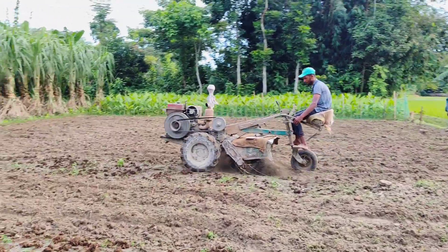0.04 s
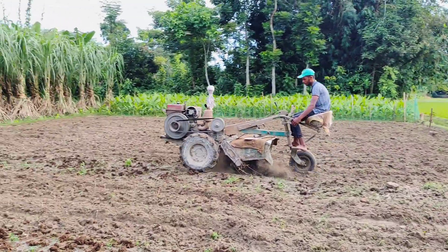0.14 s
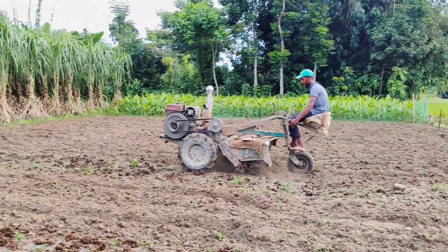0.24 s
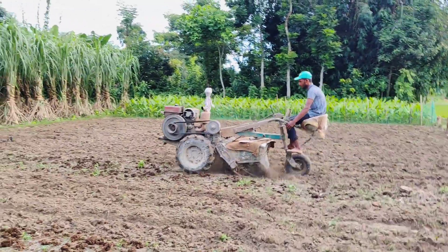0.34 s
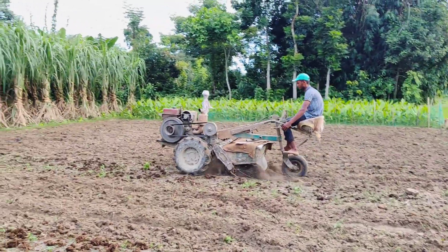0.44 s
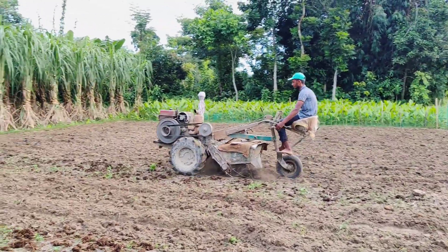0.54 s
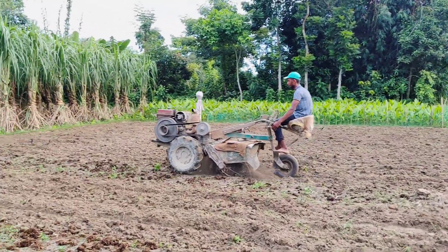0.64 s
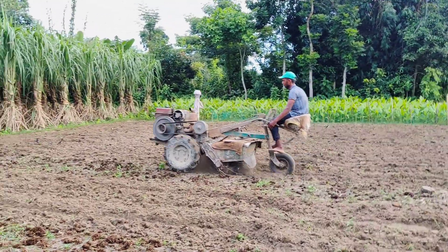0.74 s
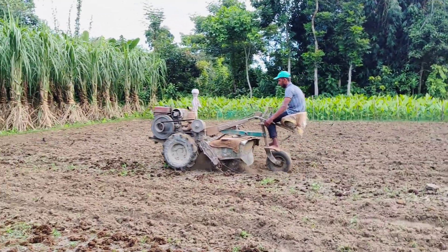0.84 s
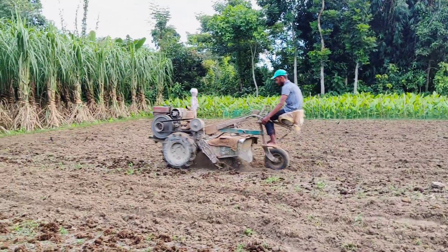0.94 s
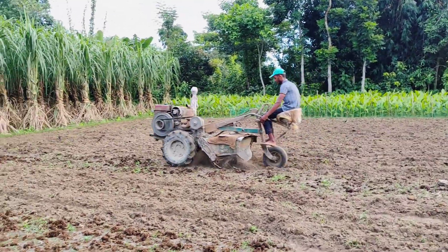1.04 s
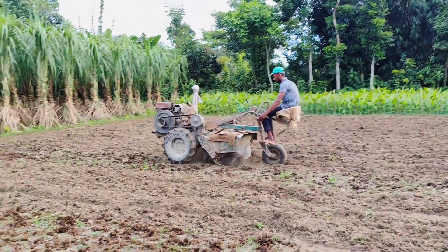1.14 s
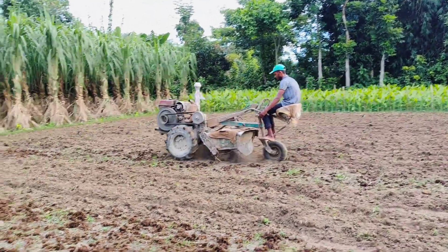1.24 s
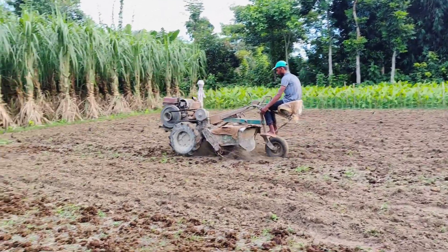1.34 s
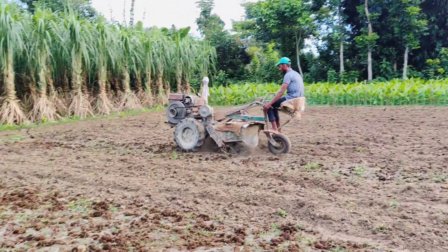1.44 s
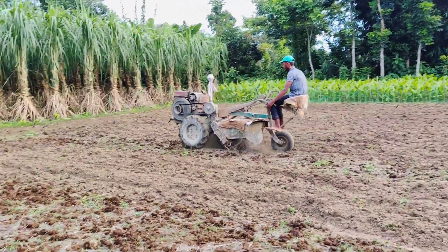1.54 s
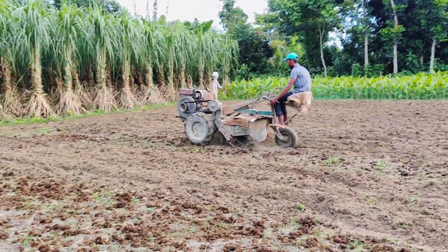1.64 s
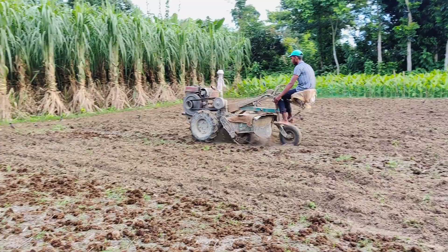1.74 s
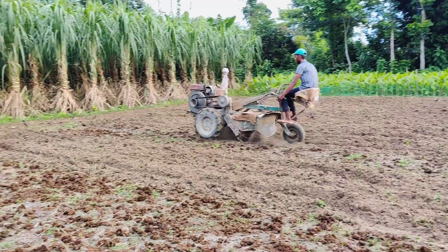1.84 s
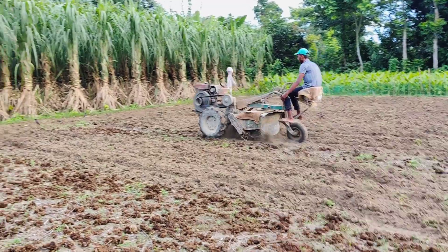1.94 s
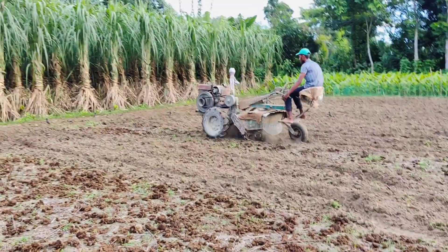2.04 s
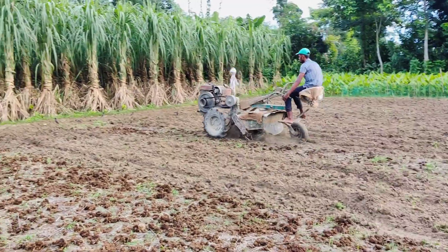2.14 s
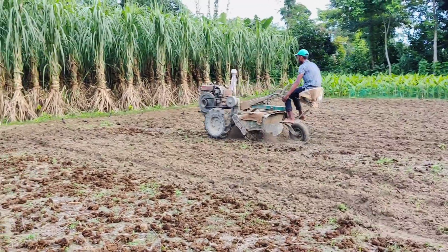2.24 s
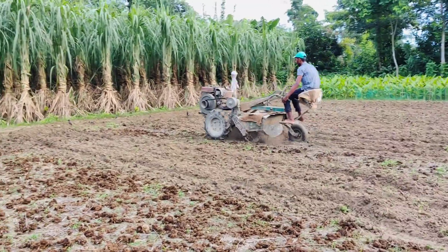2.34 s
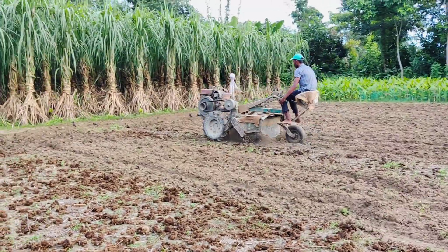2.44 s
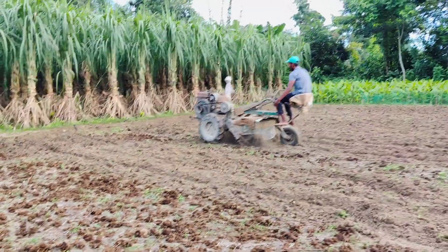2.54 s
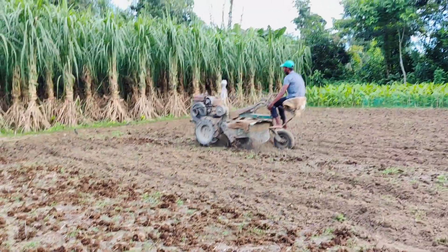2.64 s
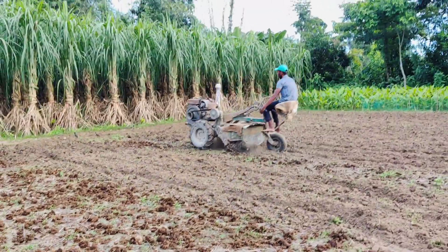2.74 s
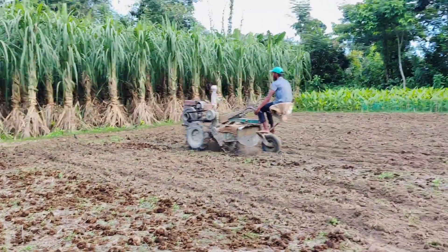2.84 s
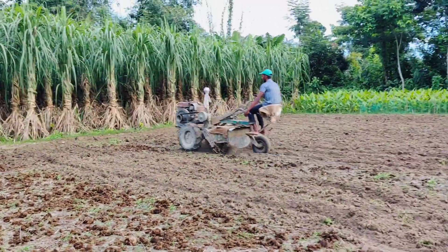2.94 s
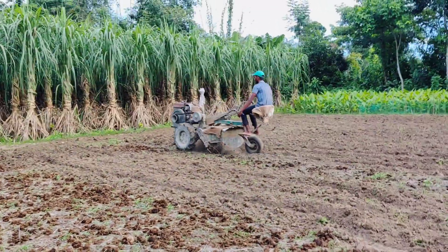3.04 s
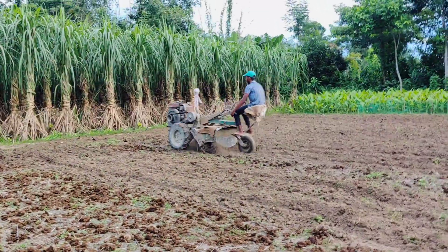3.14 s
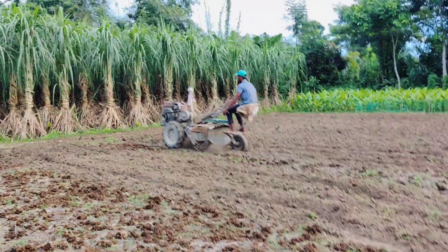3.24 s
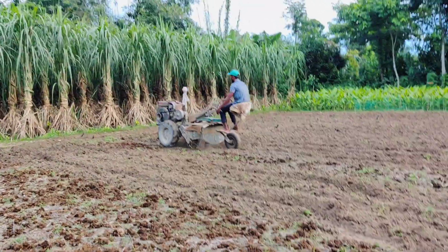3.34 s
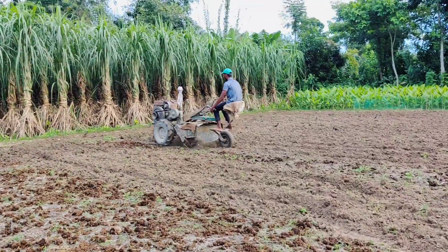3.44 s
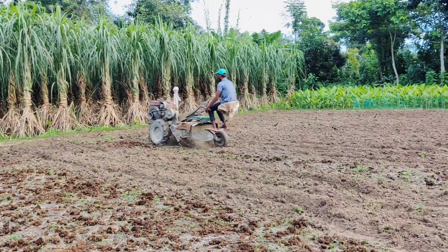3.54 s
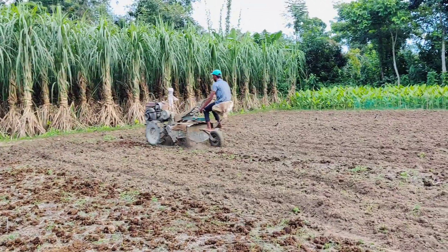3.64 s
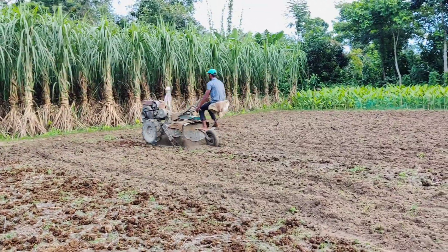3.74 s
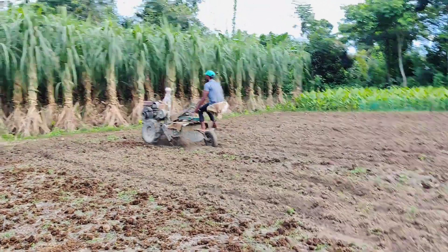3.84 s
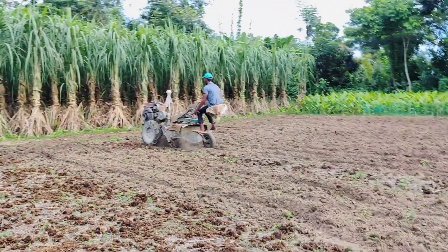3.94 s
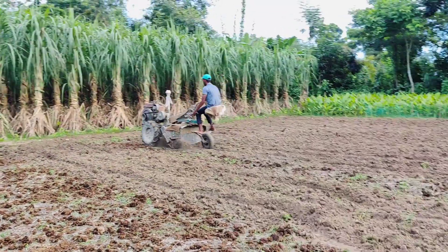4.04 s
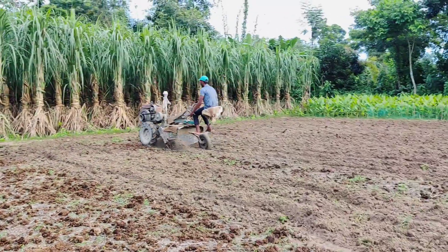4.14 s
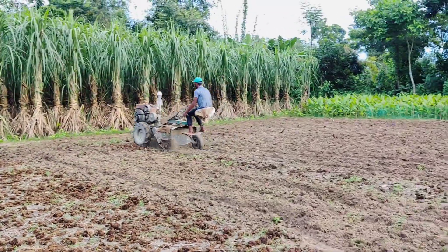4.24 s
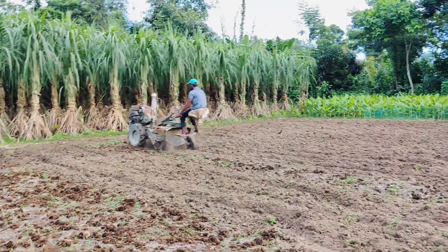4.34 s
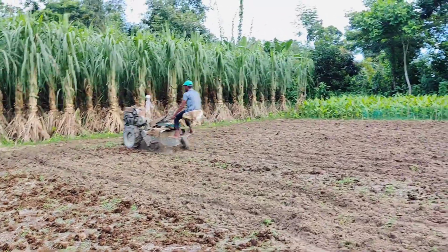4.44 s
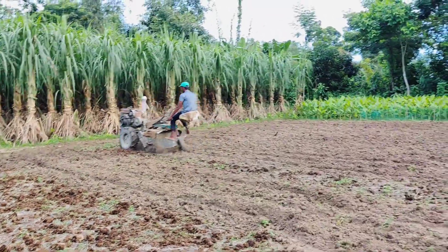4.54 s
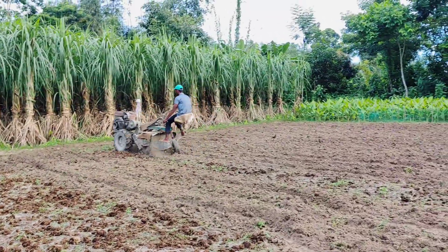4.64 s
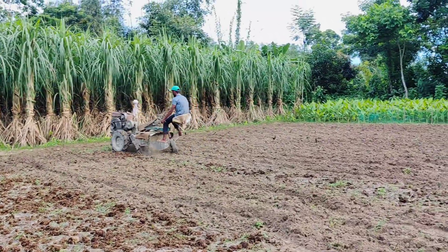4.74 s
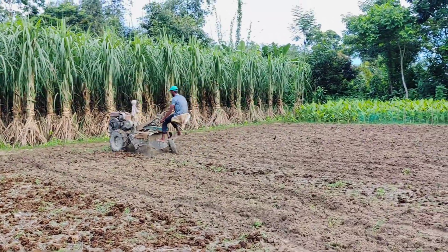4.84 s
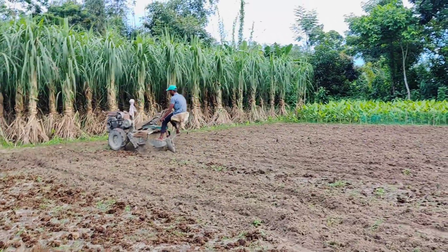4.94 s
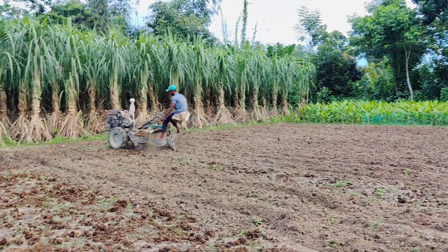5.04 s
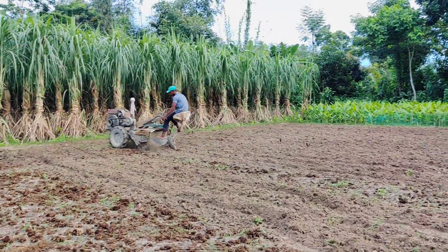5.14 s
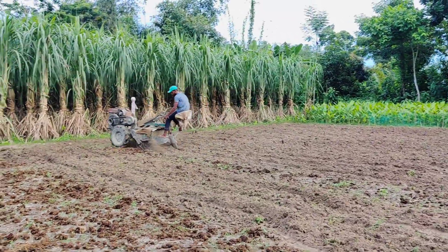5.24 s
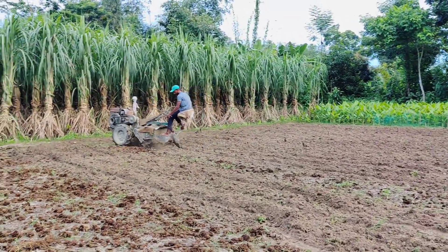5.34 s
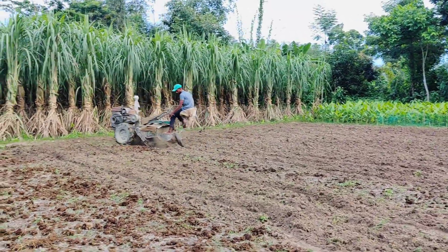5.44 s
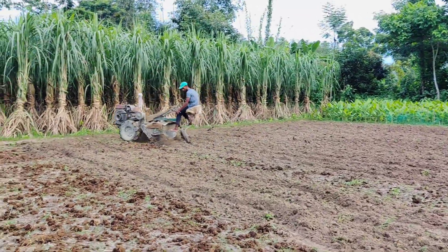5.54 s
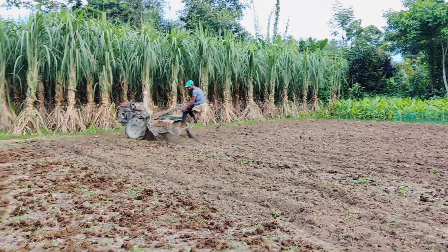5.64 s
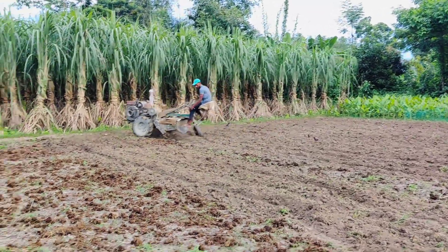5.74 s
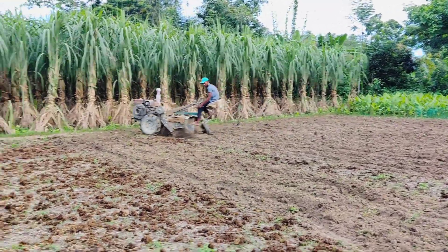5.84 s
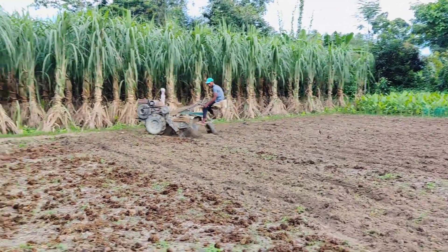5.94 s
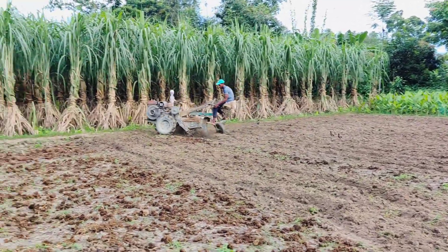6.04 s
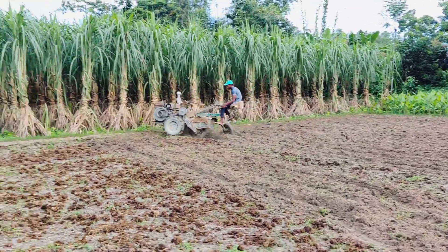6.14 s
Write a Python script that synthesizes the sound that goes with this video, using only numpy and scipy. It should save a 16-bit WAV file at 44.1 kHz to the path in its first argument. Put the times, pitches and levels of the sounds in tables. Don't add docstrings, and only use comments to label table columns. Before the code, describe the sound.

A single-cylinder diesel tiller chugs at about twelve beats a second, clattering and churning dry soil as it slowly drives away across an open field.

```python
import sys
import numpy as np
from scipy import signal
from scipy.fft import rfft, irfft
from scipy.io import wavfile
from scipy.ndimage import uniform_filter1d, map_coordinates

SR = 44100
rng = np.random.default_rng(int(sys.argv[2]) if len(sys.argv) > 2 else 0)


def pcm_store(signal):
    levels = np.round(np.clip(np.atleast_2d(signal), -1, 1) * 32767)
    wavfile.write(sys.argv[1], SR, levels.astype(np.int16).T)


def invert_db(x):
    u = np.asarray(x, float) / 20
    return 10 ** u


N = 272979
TIME = np.arange(N) / SR
START_M, AWAY_M_S = 5.3, 1.0
# (time [s], turn [dB]: deep side gains what the bright side loses, chest echo [dB])
TURN = [(0, 1.5, -4.5), (.5, -5.5, 0), (.8, 2, -2), (1.2, -3.5, -1.5), (1.5, -5, -2.5), (2, -5.5, -3),
        (2.3, -1.5, -4), (2.7, 4, -1.5), (3.3, 5, 0), (3.7, 4.5, -0.5), (4.2, 5, -0.5), (4.6, 6, 1),
        (5, 2, -4.5), (5.3, 5, -1), (5.7, 6.5, -1.5), (6.19, 4, -1.5)]


def exhaust(uneven_db, scatter, slip_ms):
    # (time after the exhaust valve opens [ms], pressure [share], width [ms])
    swings = [(-10.51, 0.24, 0.95), (-5.94, -0.12, 0.9), (0.25, 1.22, 1.15), (2.62, -0.79, 1.58),
              (6.37, -0.62, 1.28), (10.0, 0.18, 3.65), (23.0, -0.31, 2.53), (24.13, 0.55, 1.17),
              (32.77, 0.36, 1.4), (40.0, -0.03, 5.0), (48.76, -0.23, 1.79), (55.0, 0.35, 2.01),
              (57.0, -0.24, 2.82), (64.64, 0.2, 1.46), (68.49, -0.1, 2.53)]
    # (time [s], level above the mean load [dB])
    uneven = [(0.02, -0.9), (0.1, -1.4), (0.51, 0.6), (0.68, 0.6), (0.93, -0.5), (1.01, 1.0), (1.09, 1.3),
              (1.26, -0.9), (1.43, 1.2), (1.51, 0.6), (1.84, 0.6), (2.18, -0.5), (2.26, -0.4), (2.34, 0.9),
              (2.43, 0.4), (2.51, 0.6), (2.93, 1.4), (3.1, 0.6), (3.26, -1.0), (3.43, -0.5), (3.6, -0.5),
              (3.69, -1.7), (4.19, -0.8), (4.28, 0.6), (4.45, -0.4), (4.53, -0.5), (4.79, 1.2),
              (4.88, -0.5), (4.96, -0.8), (5.31, -0.5), (5.48, -1.0), (5.56, 0.7), (5.65, 0.7),
              (5.73, -0.6), (5.9, 0.9), (5.99, 1.1)]
    puff_db = 7
    out, ms = np.zeros(N), np.arange(-25, 85, 1000 / SR)
    at, share, width = np.array(swings).T[:, :, None]
    sloshing = np.abs(at - 3) > 5
    times = firings()
    extra_db = uneven_db * rng.standard_normal(len(times))
    for s, db in uneven:
        extra_db[np.argmin(np.abs(times - s))] = db
    for s, db in zip(times, extra_db):
        size, slip = rng.standard_normal((2, len(swings), 1))
        blunt_width = width * (0.93 + 0.022 * AWAY_M_S * s)
        offset = ms - at - slip_ms * sloshing * slip
        bumps = share * (1 + scatter * sloshing * size) * np.exp(-.5 * (offset / blunt_width) ** 2)
        level_db = puff_db + loss_db(s) + np.where(sloshing, 0, db)
        add(out, s + ms[0] / 1000, (invert_db(level_db) * bumps).sum(0))
    return out - uniform_filter1d(out, size=4000)


def firings():
    # (time [s], firings per second [Hz])
    speed = [(0.0, 12.099), (2.0, 12.014), (3.1, 11.879), (3.4, 11.939), (3.9, 11.729), (4.2, 11.806),
             (4.7, 11.706), (5.0, 11.624), (5.3, 11.689), (5.7, 11.698), (6.19, 11.974)]
    first_puff = .214
    cycles = np.cumsum(curves(speed)[0]) / SR - first_puff
    return np.interp(np.arange(int(cycles[-1]) + 1), cycles, TIME)


def loss_db(s):
    return -20 * np.log10(START_M + AWAY_M_S * s)


def thuds(scatter_db):
    # (time after the exhaust valve opens [ms], pitch [Hz], level at 1 m [dB], decay [ms])
    block = [
        (22.5, 426, -9.5, 1.5),
        (-19.5, 275, -9.5, 2.5),
        (45, 250, -16.5, 3.2),
        (-2.5, 316, -18.5, 5.9),
    ]
    out, ms = np.zeros(N), np.arange(0, 30, 1000 / SR)
    for s in firings():
        for (at, hz, db, decay), c in zip(block, rng.standard_normal(len(block))):
            ring = np.exp(-ms / decay) * np.sin(2 * np.pi * hz * ms / 1000)
            add(out, s + at / 1000, invert_db(db + scatter_db * c + loss_db(s)) * ring)
    return out


def machine():
    # (time [s], gear strain [dB], tine bite [dB])
    work = [(0, 1.5, -1.5), (.3, -2.5, -1), (.7, 0, -1), (1.2, -0.5, 2), (1.5, -1, 0), (1.9, 0, -1.2),
            (2.15, 0.5, -1.5), (2.45, 2.5, -0.9), (2.8, .5, -2), (3.3, 0.5, -1.8), (3.9, 0.1, 0),
            (4.5, 1, -2.5), (4.8, 1, -2), (5.1, 1, 2), (5.4, -1, -2), (5.9, 0.5, -1), (6.19, 2, 1.5)]
    # (frequency [Hz], level [dB])
    casing_tone = [(300, -17), (480, -10), (600, -2.5), (780, -0.5), (1000, -6.5), (1300, -25.5),
                   (1800, -34)]
    gears_tone = [(700, -26.5), (1000, -4), (1300, 2), (2000, -5.5), (2600, -4), (3200, -9), (4200, -26.5)]
    soil_tone = [(2000, -58), (2800, 3), (3500, 2), (4700, 2), (5500, 1), (6500, 0.5), (7600, -8),
                 (8200, -14.5)]
    # (frequency [Hz], level [dB])
    deep_side = [(300, -6), (560, 0), (700, -8), (850, -30)]
    bright_side = [(750, -30), (880, -8), (1050, 0), (1300, -8)]
    casing_db, gears_db, soil_db = -12.5, -14.5, -14
    shade_db_per_s = 0.63
    strain_db, depth_db = curves(work)
    bite, knock_db = walk(9), knocking(2, scatter=.6)
    casing_lift = knocking(0, scatter=.6) + .3 * bite + .5 * walk(20)
    casing = rattle(casing_tone, grain_db=.8, lift_db=casing_lift)
    turn_db = curves(TURN)[0]
    deep, bright = colour(casing, deep_side), colour(casing, bright_side)
    casing = casing + (invert_db(turn_db) - 1) * deep + (invert_db(-turn_db) - 1) * bright
    gears_lift = knocking(1, scatter=.7) + .6 * bite + .5 * walk(20)
    gears = rattle(gears_tone, grain_db=1.6, lift_db=gears_lift)
    soil_lift = 1.05 * knock_db + .8 * bite + .6 * walk(25)
    soil = rattle(soil_tone, grain_db=1.9, lift_db=soil_lift)
    soil = soil + invert_db(-3.5) * dust(0.6 * knock_db + .9 * bite)
    out = invert_db(casing_db - shade_db_per_s * TIME) * casing
    out = out + invert_db(gears_db + strain_db) * gears + invert_db(soil_db + depth_db) * soil
    return invert_db(loss_db(TIME)) * out


def knocking(part, scatter):
    # (time after the exhaust valve opens [ms],
    # lift of casing [dB], of gears [dB], of soil [dB], length [ms])
    knocks = [
        (-16, 3, 6, 6, 4.8),
        (0.2, 1.5, 5, 9.5, 4.8),
        (23.5, 7, 1.5, 9.5, 2.9),
        (47, 4.5, .5, 3.5, 2.8),
    ]
    out, ms = np.zeros(N), np.arange(0, 40, 1000 / SR)
    for s in firings():
        chance = rng.uniform(-1, 1, len(knocks))
        for (at, *db, length), c in zip(knocks, chance):
            add(out, s + at / 1000, db[part] * (1 + scatter * c) * np.exp(-ms / length))
    return uniform_filter1d(out, size=130)


def rattle(points, grain_db, lift_db):
    clicks = rng.standard_normal(N) * invert_db(grain_db * rng.exponential(size=N) + lift_db)
    return unit(colour(clicks, points))


def dust(lift_db):
    # (frequency [Hz], level [dB])
    spray = [(7900, 1.5), (8600, 2.5), (9600, 1), (10600, 2.5), (11700, 5.5), (12900, 10), (14200, 0.5)]
    air_db_per_m = -0.34
    out = np.zeros(N)
    for hz, db in spray:
        band = [(.9 * hz, -40), (.95 * hz, 0), (1.05 * hz, 0), (1.11 * hz, -40)]
        grains = rattle(band, grain_db=.6, lift_db=lift_db)
        air_db = air_db_per_m * AWAY_M_S * TIME * (hz > 11000)
        out += grains * invert_db(db - air_db + 2.0 * walk(7) + 1.6 * walk(25))
    return unit(out)


def clods(hit_db, decay_s):
    # (time [s], peak [dB], ring [Hz], grit [share])
    strikes = [(0.045, -26, 880, .3), (0.08, -19, 900, 0.27), (0.245, -28, 860, .3),
               (0.585, -15, 750, 0.34), (0.662, -19, 920, .3), (1.573, -24, 730, .3), (1.594, -23, 800, .2),
               (1.639, -23, 725, .2), (1.723, -21, 765, 0.34), (1.742, -33, 825, .2), (1.783, -30, 730, .2),
               (1.825, -20, 670, .3), (2.323, -19, 1465, .3), (2.366, -20, 755, .2), (2.642, -31, 710, .2),
               (2.7, -27, 1350, .3), (2.91, -34, 1460, .3), (3.035, -26, 721, .2), (3.079, -23, 690, .2),
               (3.372, -24, 702, .2), (3.501, -20, 794, 0.35), (3.818, -25, 920, .3), (3.939, -40, 760, .2),
               (4.196, -28, 1430, .3), (4.279, -18.5, 1370, 0.18), (4.328, -31, 910, .3),
               (4.688, -23.5, 770, .2), (4.775, -26, 855, .3), (4.985, -21, 776, .2), (5.072, -27, 616, .2),
               (5.204, -20, 1314, 0.44), (5.543, -26, 633, .2), (5.611, -28, 724, .2),
               (5.927, -27, 650, .2)]
    out, t = np.zeros(N), np.arange(0, .06, 1 / SR)
    for s, db, hz, share in strikes:
        grit = share * np.diff(rng.standard_normal(len(t) + 1))
        add(out, s, invert_db(db + hit_db) * np.exp(-t / decay_s) * (np.sin(2 * np.pi * hz * t) + grit))
    return out


def ticks(hit_db, rise_s, decay_s):
    # (time [s], peak [dB], left minus right [dB])
    stones = [(0.165, -16, -1.0), (0.3292, -14, -2.0), (0.4888, -19, -4.0), (0.578, -13, -6),
              (0.662, -14, -4.0), (0.9936, -17, -2.5), (1.4262, -17, -2.5), (1.5933, -12, -0.5),
              (1.7579, -25, 1.0), (1.8801, -13, 2.5), (1.9894, -15, 2.5), (2.157, -20, 2.0),
              (2.2822, -23, 1.0), (2.6579, -17, 2.0), (2.8474, -21, 2.0), (2.9093, -15, 3.0),
              (3.1457, -18, 0.5), (3.2465, -28, 1.5), (3.3328, -17, 1.5), (3.497, -21, 0.0),
              (3.6052, -16, -0.5), (3.8357, -21, -0.5), (4.2782, -29, -3.0), (4.4313, -29, -2.5),
              (4.4523, -21, -1.0), (4.4872, -17, 1), (4.662, -22, 0.0), (4.6887, -27, -1.0),
              (4.772, -24, -0.5), (4.7935, -25, 0), (4.9437, -22, -0.5), (5.0225, -16, -1.0),
              (5.1362, -17, -4), (5.1996, -21, -1.0), (5.5428, -19, 0.0), (5.7139, -22, -1.0),
              (5.8004, -23, -1.0), (5.928, -26, -1.0), (6.0721, -18, -1.5)]
    out, t = np.zeros((2, N)), np.arange(0, .04, 1 / SR)
    for s, db, pan in stones:
        shape = np.exp(-t / decay_s) * np.minimum(t / rise_s, 1)
        burst = invert_db(db + hit_db) * shape * rng.standard_normal(len(t))
        for side, sign in zip(out, (.5, -.5)):
            add(side, s - .001, invert_db(sign * pan) * burst)
    return np.array([colour(x, [(900, -29), (2000, 7), (6000, 7), (8000, -12)]) for x in out])


def ports(clatter):
    # (time [s], chest echo delay [ms], aim as left minus right treble [dB])
    hand = [(0, 1.13, -.5), (.7, 1.2, -2.3), (1.4, 1.24, -2.3), (2.05, 1.26, -.2), (2.3, 1.44, -.3),
            (2.6, 1.62, -.4), (3.2, 1.69, -.3), (3.6, 1.6, -.5), (4, 1.51, -.8), (4.5, 1.6, -1),
            (5, 1.7, -.5), (5.5, 1.93, -.7), (5.8, 1.78, -1), (6.19, 1.72, -1)]
    # (frequency [Hz], level [dB])
    chest = [(250, -16.5), (700, -6.5), (1500, -0.5), (2200, 2), (3000, -8), (5000, -11), (12000, -3)]
    left_echo_ms, pan_db = curves(hand)
    right_ms = 0.15 + 0.012 * TIME
    right_echo_ms = left_echo_ms + 0.078
    echo = colour(clatter, chest) * invert_db(curves(TURN)[1])
    shaded = colour(clatter, [(500, -1.5), (1000, 5.5), (2000, 2.0), (6000, -9.5)])
    left = invert_db(3.0) * clatter + invert_db(1.0) * late(echo, left_echo_ms)
    right = invert_db(-1.5) * late(shaded, right_ms) + invert_db(7.0) * late(echo, right_echo_ms)
    bright = colour(clatter, [(500, -18), (1000, -2), (2500, -1), (5000, 1.5)])
    left = left + invert_db(-3) * cane(bright, decay_s=.02, turn_hz=2.5)
    right = right + invert_db(-3) * cane(bright, decay_s=.02, turn_hz=3.1)
    left_treble, right_treble = (colour(x, [(1200, 1.5), (2500, 17.5)]) for x in (left, right))
    left = left + (invert_db(0.052 * pan_db) - 1) * left_treble
    right = right + (invert_db(-.45 * pan_db) - 1) * right_treble
    return np.array([left, right])


def cane(x, decay_s, turn_hz):
    tail = np.exp(-np.arange(0, .12, 1 / SR) / decay_s)
    a, b = (signal.fftconvolve(x, tail * rng.standard_normal(len(tail)))[:N] for _ in range(2))
    turn = 2 * np.pi * turn_hz * TIME
    return (np.cos(turn) * a + np.sin(turn) * b) / np.sqrt(np.sum(tail ** 2))


def furrows(both):
    # (time [s], lower gap [Hz], depth [share], upper gap [Hz], depth [share])
    crests = [(0, 3430, 0.16, 4700, .3), (.3, 3400, .3, 4570, .5), (.55, 3260, 0.88, 4670, .2),
              (.8, 3140, .8, 4670, 0.85), (1.15, 3100, 0.51, 4700, 0.51), (1.5, 3010, 0.53, 4540, 0.4),
              (2, 3000, 0.58, 4670, .6), (2.4, 2910, 0.55, 4580, .4), (3, 2680, 0.58, 4800, 0.33),
              (3.6, 2700, 0.18, 4900, 0.18), (4, 3030, .9, 4800, 0.79), (4.3, 2820, .6, 4760, 0.59),
              (4.55, 2780, 1, 4750, 0.73), (4.9, 2930, .1, 4650, 0.38), (5.5, 2930, .5, 4700, .2),
              (5.7, 3120, .5, 4700, 0.64), (5.87, 3200, 0.3, 5000, 0.45), (6.19, 3260, 0.45, 4970, .2)]
    low_hz, low_depth, high_hz, high_depth = curves(crests)
    both = gap(both, low_hz, low_depth, width_hz=200)
    return gap(both, high_hz, high_depth, width_hz=290)


def brief_dips(x):
    # (time [s], length [s], frequency [Hz], depth [share])
    dips = [(1.2, 0.22, 9600, 1), (1.3, 0.32, 1040, 0.45), (3.25, 0.21, 8900, 0.68),
            (4.1, 0.13, 8100, 0.75), (4.65, 0.48, 540, .5), (2.746, 0.089, 1570, .95),
            (3.15, 0.36, 1670, 0.51), (4.604, 0.28, 4680, 0.56), (4.62, 0.12, 5140, 0.48),
            (4.9, 0.22, 3330, 0.61), (5.146, 0.17, 3940, 0.46), (5.35, 0.51, 1580, 1),
            (5.798, 0.33, 5100, 0.3), (5.902, 0.27, 1610, 0.52)]
    lost = 0
    for s, length, hz, depth in dips:
        band = signal.butter(1, [0.98 * hz, 1.087 * hz], "band", fs=SR, output="sos")
        lost = lost + np.clip(depth, 0, 1) * swell(s, length) * signal.sosfiltfilt(band, x)
    return x - lost


def soft_ground(both):
    # (time [s], frequency [Hz], depth [share])
    bounce = [
        (0, 538, 0.77),
        (1.1, 553, 0.65),
        (1.4, 434, 0.37),
        (2.2, 416, 0.66),
        (3, 410, 0.24),
        (4, 456, 0.29),
        (5, 453, 0.52),
        (6.19, 426, 0.46),
    ]
    return gap(both, *curves(bounce), width_hz=71)


def finger():
    # (time [s], length [s], level [dB])
    rustles = [
        (.05, .2, -21),
        (.25, 0.25, -25),
        (1.02, 0.18, -33),
        (2.1, .2, -30),
        (3.15, .2, -29),
        (3.88, .25, -26),
        (5.2, .2, -43),
        (5.78, 0.27, -28),
        (6.05, 0.22, -31),
    ]
    # (frequency [Hz], level [dB])
    skin_tone = [(9500, -26), (11000, -5), (12500, 5), (15000, -5)]
    skin = rattle(skin_tone, grain_db=1.0, lift_db=1.5 * walk(30))
    return skin * sum(invert_db(db) * swell(s, length) for s, length, db in rustles)


def rumble():
    # (frequency [Hz], level [dB])
    earth = [(20, 3), (60, -9.5), (120, -4.5), (200, -11.5), (265, -3), (330, -11), (440, -22),
             (900, -55.5)]
    return unit(colour(rng.standard_normal(N), earth)) * invert_db(-11.5 + 1.29 * loss_db(TIME))


def drone():
    # (frequency [Hz], level [dB])
    hum = [(440, -30), (495, -4), (508, 0), (522, -4), (580, -30)]
    return invert_db(-49) * unit(colour(rng.standard_normal(N), hum))


def colour(x, points):
    hz, db = np.transpose(points)
    grid = np.maximum(np.arange(2049) * SR / 4096, 1)
    cep = irfft(np.interp(np.log(grid), np.log(hz), db) * np.log(10) / 20)
    cep[1:2048] *= 2
    cep[2049:] = 0
    taps = irfft(np.exp(rfft(cep)))[:2048]
    return signal.fftconvolve(x, taps)[:N]


def unit(x):
    return x / np.sqrt(np.mean(x ** 2))


def walk(rate):
    k = int(SR / rate)
    held = np.repeat(rng.standard_normal(N // k + 1), k)
    return 0.7 * uniform_filter1d(uniform_filter1d(held, k), k)[:N]


def late(x, ms):
    return map_coordinates(x, [np.arange(N) - ms * SR / 1000], order=3, mode="nearest")


def curves(table):
    s, *columns = np.transpose(table)
    return [np.interp(TIME, s, c) for c in columns]


def add(out, s, shape):
    i = int(round(s * SR))
    a, b = max(i, 0), min(i + len(shape), N)
    if b > a:
        out[a:b] += shape[a - i:b - i]


def swell(s, length):
    return np.exp(-.5 * ((TIME - s) / (length / 2)) ** 2)


def gap(x, hz, depth, width_hz):
    spin, k = np.exp(2j * np.pi * np.cumsum(hz) / SR), int(SR / width_hz)
    smooth = lambda v: uniform_filter1d(uniform_filter1d(v, k), k)
    base = x / spin
    band = (smooth(base.real) + 1j * smooth(base.imag)) * spin
    return x - 2 * np.clip(depth, 0, 1) * band.real


def scene():
    low = exhaust(uneven_db=-0.6, scatter=0.033, slip_ms=0.48) + thuds(scatter_db=3.5)
    clatter = machine() + clods(hit_db=-3.5, decay_s=.007)
    both = ports(clatter) + ticks(hit_db=-7, rise_s=.0015, decay_s=0.0055)
    left, right = brief_dips(furrows(both)) + finger() * invert_db([[-9.5], [0]])
    low = low + drone() + rumble()
    shake = rumble()
    left = left + invert_db(2.5) * low + invert_db(-29) * shake
    right = right + invert_db(1.53) * low - invert_db(-33) * shake
    return soft_ground(np.array([left, right]))


def top_cut(x):
    return signal.sosfilt(signal.butter(12, 15500, fs=SR, output="sos"), x)


def record(dry):
    # (frequency [Hz], level [dB])
    phone = [(20, -0.5), (6500, -1), (6900, -5), (7400, -12), (9000, -19), (9600, -14.5), (12000, -30.5),
             (14900, -25), (15100, -42)]
    shelved = np.array([colour(x, phone) for x in dry])
    return top_cut(shelved)


dry = scene()
out = record(dry)
pcm_store(out)
```